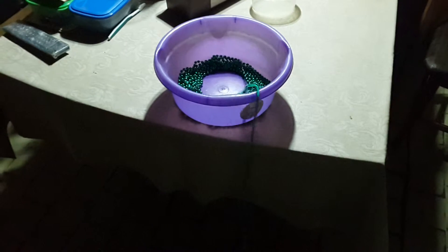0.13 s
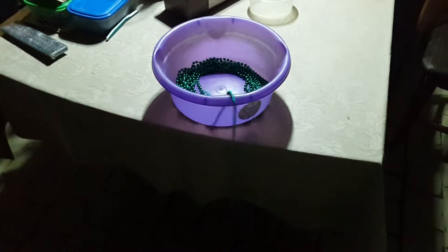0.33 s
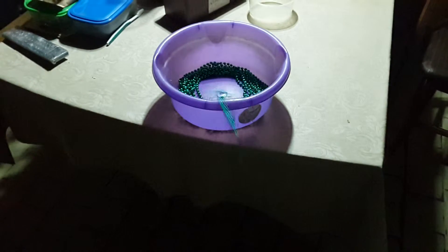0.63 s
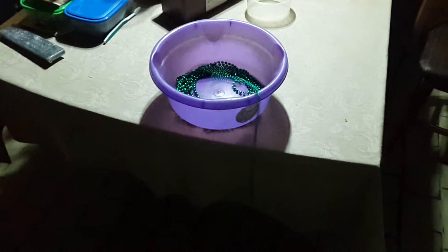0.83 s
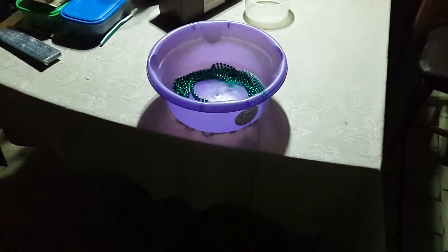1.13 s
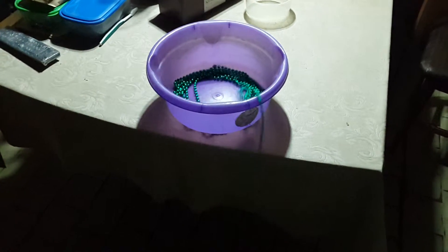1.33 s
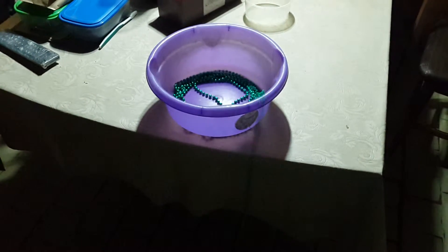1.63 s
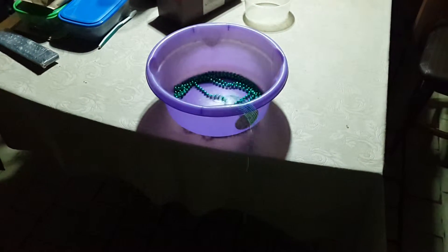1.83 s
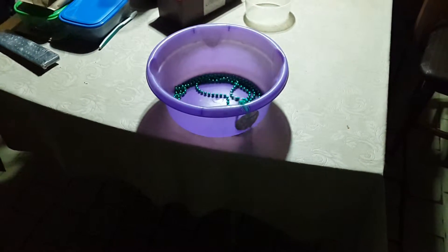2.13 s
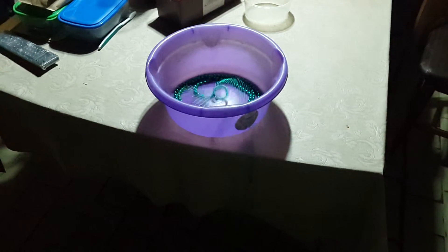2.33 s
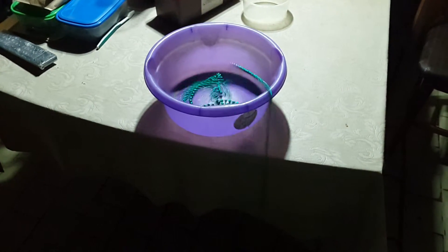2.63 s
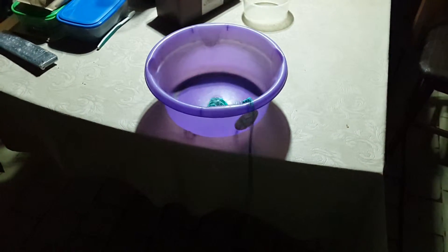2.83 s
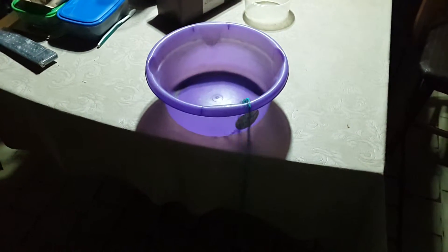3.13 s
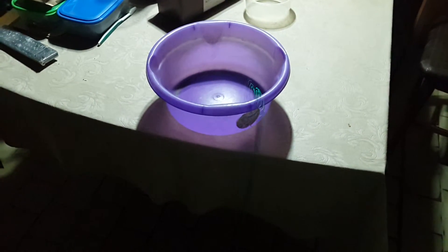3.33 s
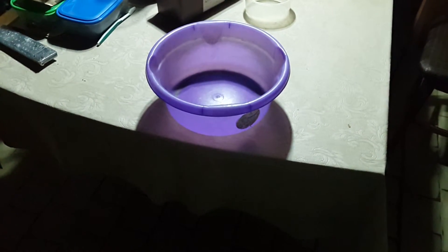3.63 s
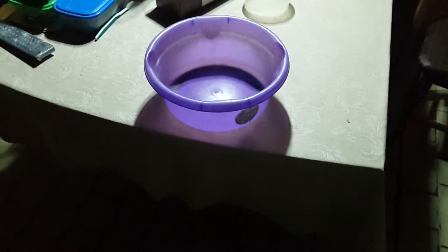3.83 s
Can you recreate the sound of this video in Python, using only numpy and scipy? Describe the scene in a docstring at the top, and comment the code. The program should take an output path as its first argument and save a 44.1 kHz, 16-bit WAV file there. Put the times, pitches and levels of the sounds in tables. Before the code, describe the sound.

A bead chain rattles out of a plastic bowl and pours onto the floor.

```python
"""A plastic bowl on a table in a small room, a phone microphone near enough to favour the direct sound.
From the start a long bead chain pulls itself over the rim in surges and pours onto the floor below.
Beads drag, loops slap: each contact ticks, rings the wall and knocks the base, and the table top hums.
Along the way single beads snap against the rim and the jolted bowl clacks. At about 3.5 s it runs
empty; the tail lands with a thin bright rattle, heard alone, and a few beads settle."""
import sys
import numpy as np
from scipy import signal
from scipy.fft import rfft, irfft
from scipy.io import wavfile
from scipy.ndimage import uniform_filter1d

SR = 44100
rng = np.random.default_rng(int(sys.argv[2]) if len(sys.argv) > 2 else 0)


def transcribe(signal):
    """Save signal, clipped to [-1, 1], as a 16-bit WAV file at the path in sys.argv[1]."""
    frames = np.atleast_2d(signal).T
    limited = np.clip(frames, -1, 1)
    pcm = np.round(limited * 32767).astype(np.int16)
    wavfile.write(sys.argv[1], SR, pcm)


N = 176400  # 4 s
RIM_BEADS_PER_S, RIM_CLUMP_DB = 850, 3.5


def undb(db):
    """Decibels to gain."""
    return 10 ** (np.asarray(db) / 20)


def unit(h):
    """Scale a response to unit energy."""
    return h / np.sqrt(np.sum(h ** 2, axis=-1, keepdims=True))


def fade(t, t60):
    """Ring-down that loses 60 dB in t60 seconds."""
    return np.exp(-np.log(1000) * t / t60)


def colour(points, size=2048):
    """Causal response with the outline (frequency [Hz], gain [dB])."""
    hz, db = np.array(points, float).T
    bins_hz = np.maximum(np.fft.rfftfreq(size, 1 / SR), 1)
    cepstrum = irfft(np.log(undb(np.interp(np.log(bins_hz), np.log(hz), db))))
    cepstrum[1:size // 2] *= 2
    cepstrum[size // 2 + 1:] = 0
    return irfft(np.exp(rfft(cepstrum)))


def through(x, h):
    """Pass a sound through a response."""
    return signal.oaconvolve(x, h, axes=-1)[..., :x.shape[-1]]


def stereo_noise(likeness, length, spots=10):
    """Random left and right values for each contact spot; likeness 1 makes the sides equal."""
    mid, side = rng.standard_normal((2, spots, 1, length))
    return mid * np.sqrt(1 + likeness) + side * np.sqrt(1 - likeness) * np.array([[1], [-1]])


def tick(points, t60, likeness, resonance_db=0, spots=10, size=1024):
    """A bead's short crack, duller on soft spots, brighter on hard; resonance_db gives each a pitch."""
    outline_hz, outline_db = np.array(points, float).T
    hz = np.geomspace(outline_hz[0], outline_hz[-1], size // 10)
    db = np.interp(np.log(hz), np.log(outline_hz), outline_db)
    hardness_db_per_octave = 5 * np.linspace(-1, 1, spots)[:, None]
    tilts = hardness_db_per_octave * np.maximum(np.log2(hz / 4080), -1)
    bead_hz = rng.permutation(np.geomspace(4570, 7090, spots))[:, None]
    humps = resonance_db * np.exp(-(np.log2(hz / bead_hz) / .11) ** 2)
    burst = stereo_noise(likeness, size) * fade(np.arange(size) / SR, t60)
    colours = np.array([[colour(np.c_[hz, db + shape])] for shape in tilts + humps])
    return unit(through(burst, colours))


def ring(modes, detune=0, spots=10, size=6000):
    """Damped modes, mixed anew at each spot; the chain's weight shifts pitch by up to the share detune."""
    hz, db, t60 = np.array(modes).T[:, :, None]
    t = np.arange(size) / SR
    mix = stereo_noise(likeness=1, length=len(modes))
    mix /= np.sqrt(np.mean(mix ** 2, axis=0))
    shift = 1 + detune * rng.permutation(np.linspace(-1, 1, spots))[:, None, None]
    partials = undb(db) * unit(np.sin(2 * np.pi * hz * shift * t) * fade(t, t60))
    return unit(mix @ partials)


def radiate(pushes, responses, places=5):
    """What the contact spots give off, gathered into a few places in the room."""
    return through(pushes[:, None], responses).reshape(places, -1, 2, N).sum(axis=1)


def pressure(stretches, attack_s=0.0012, release_s=0.0092):
    """Contact strength: builds fast, sags to its end level (negative sag swells) and lets go."""
    out = np.zeros(N)
    for start, end, end_db, sag_db in stretches:
        i = np.arange(int(start * SR), min(int((end + 10 * release_s) * SR), N))
        t = i / SR
        along = np.clip((t - start) / (end - start), 0, 1)
        attack = np.clip((t - start) / attack_s, 0, 1)
        release = np.exp(-np.maximum(t - end, 0) / release_s)
        out[i] += attack * undb(end_db + sag_db * (1 - along)) * release
    return out


def bead_stream(per_s, clump_db, spread_db=3, clump_s=.004, even_s=0.036, spots=10, size=8000):
    """Beads hit random spots in clumps, unevenly timed and sized; the flow evens out over even_s."""
    late, strength, bunching = rng.standard_normal((3, size))
    spot = rng.integers(0, spots, size)
    when = (np.arange(size) + .6 * late) / per_s
    clumps = np.interp(when / clump_s, np.arange(size), bunching)
    push = undb(spread_db * strength + clump_db * clumps)
    local_power = uniform_filter1d(push ** 2, int(even_s * per_s))
    push *= np.sqrt(SR / per_s / local_power) * rng.choice([-1, 1], size)
    at = (when * SR).astype(int)
    heard = (at >= 0) & (at < N)
    out = np.zeros((spots, N))
    out[spot[heard], at[heard]] = push[heard]
    return out


def clusters(times, dbs, length_s, spots=10, hits=9):
    """A few contacts almost together, hardest a quarter of the way through."""
    out = np.zeros((spots, N))
    for start, db in zip(times, dbs):
        along = (np.arange(hits) + rng.random(hits) - .5).clip(0) / hits
        at = np.minimum(((start + along * length_s) * SR).astype(int), N - 1)
        weights = unit(undb(-14.5 * abs(along - 0.25)))
        out[rng.permutation(spots)[:hits], at] += undb(db) * np.sqrt(length_s * SR) * weights
    return out


def wander(spread_db, step_s=.005, size=4000):
    """Quick random changes of strength as the contact wanders; mean power 1."""
    gain = undb(spread_db * np.interp(np.arange(N) / SR / step_s, np.arange(size), rng.standard_normal(size)))
    return gain / np.sqrt(np.mean(gain ** 2))


# Room tone at the microphone (frequency [Hz], relative level [dB])
ROOM_TONE_COLOUR = [(20, -35), (45, -10.5), (95, 2), (125, -1), (155, -0.5), (330, -9), (720, -18.5),
                    (1500, -28), (6000, -26.5)]
def room_tone():
    """Faint low rumble of the room, nearly alike left and right."""
    noise = stereo_noise(likeness=0.96, length=N, spots=1)[0] / np.sqrt(2)
    return undb(-53) * through(noise, unit(colour(ROOM_TONE_COLOUR))[None])


def room(places, tail_db=-2.5, delay_s=.004, alike_below_hz=910, treble_hz=2000, size=20000):
    """Each place has its own short diffuse tail; bass is alike at both ports and treble dies first."""
    t = np.arange(size) / SR
    mid, side = rng.standard_normal((2, len(places), size))
    side = signal.sosfilt(signal.butter(2, alike_below_hz, "high", fs=SR, output="sos"), side)
    noise = np.stack([mid + side, mid - side], axis=1)
    low = signal.sosfiltfilt(signal.butter(4, treble_hz, fs=SR, output="sos"), noise)
    decay = low * fade(t, t60=0.37) + (noise - low) * fade(t, t60=0.22)
    tail = unit(decay * (t > delay_s))
    return (places + undb(tail_db) * through(places, tail)).sum(axis=0)


# Modes of the table top (frequency [Hz], relative level [dB], t60 [s])
TABLE_MODES = [(92, -18, 0.12), (126, 1, 0.33)]
# Drive on the table, under the bowl (time [s], level [dB])
TABLE_DRIVE = [(0, -54), (1.9, -63), (2.4, -77), (3.5, -71), (3.7, -86)]
def table_hum():
    """The running chain drums the table top into a low hum."""
    times, dbs = np.array(TABLE_DRIVE).T
    drive = undb(np.interp(np.arange(N) / SR, times, dbs))
    pushes = bead_stream(RIM_BEADS_PER_S, RIM_CLUMP_DB).sum(axis=0) * drive
    return through(pushes[None], ring(TABLE_MODES)[0])


# Down on the floor: the chain landing, its tail last (start [s], end [s], end level [dB], sag [dB])
FLOOR_LANDINGS = [(0, 3.66, -41, 3.5), (3.58, 3.7, -45, -11), (3.685, 3.74, -40, 5),
                  (3.741, 3.790, -25.5, -0.5), (3.80, 3.9, -49, -4)]
# Last beads settling (time [s], relative level [dB])
FLOOR_SETTLES = [(3.65, -30), (3.685, -23), (3.899, -25.5), (3.922, -32.5), (3.9599, -38), (3.9806, -27),
                 (3.9914, -28)]
# A bead's tick on the floor (frequency [Hz], relative level [dB])
FLOOR_TICK_COLOUR = [(300, -35), (1500, -31), (3000, -19), (4500, -14.5), (6000, -10.5), (8000, -1),
                     (11000, 1.5), (15000, -2.5)]
def floor_heap():
    """The chain pours steadily onto its heap; the tail drops and a few beads roll into place."""
    times, dbs = np.array(FLOOR_SETTLES).T
    pouring = bead_stream(per_s=650, clump_db=-0.5) * pressure(FLOOR_LANDINGS)
    settling = clusters(times, dbs - 5.5, length_s=0.0013)
    return radiate(pouring + settling, tick(FLOOR_TICK_COLOUR, t60=0.007, likeness=0))


# Up on the table: jolts of the bowl (time [s], frequency [Hz], level [dB], t60 [s])
BOWL_JOLTS = [(1.131, 650, -15, 0.06), (1.317, 1015, -25.5, 0.21), (2.455, 494, -27, 0.2),
              (2.784, 455, -25, 0.22), (3.021, 1364, -20.5, 0.12), (3.944, 480, -40.5, 0.031)]
def bowl_knocks(rise_s=0.00053):
    """Each jolt rings one damped mode of the bowl: a short knock or clack."""
    out = np.zeros(N)
    for start, hz, db, t60 in BOWL_JOLTS:
        t = np.maximum(np.arange(N) / SR - start, 0)
        out += undb(db) * np.sin(2 * np.pi * hz * t) * fade(t, t60) * (1 - np.exp(-t / rise_s))
    return out


# At the rim: single beads striking (time [s], pitch [Hz], level [dB])
RIM_SNAPS = [(0.0621, 5370, -3.5), (0.086, 6000, -6), (0.2594, 5600, -5), (0.8307, 2700, -2),
             (0.8982, 5800, -3.5), (1.1728, 4800, -7), (1.4194, 5200, -1.5), (1.7078, 2500, -1),
             (1.9158, 6300, -5.5), (2.1132, 5200, -7), (2.6963, 7000, 2.5), (2.952, 7500, 3.5),
             (3.0074, 5500, -1.5), (3.2074, 5000, -0.5), (3.373, 6000, -3), (3.4254, 4200, 3),
             (3.4270, 4600, 1.5)]
def rim_snaps(size=1024):
    """Single beads whip against the rim: hard clicks, each with its own pitch."""
    out = np.zeros((2, N))
    t = np.arange(size) / SR
    for start, hz, db in RIM_SNAPS:
        burst = stereo_noise(likeness=0.33, length=size, spots=1)[0] * fade(t, t60=0.0067)
        peak = colour([(hz / 10, -12), (hz, 0), (hz * 2, -11.5)])
        at = int(start * SR)
        out[:, at:at + size] += undb(db) * unit(through(burst, peak[None]))
    return out


# Surges of chain over the bowl's wall, with the levels they end on
# (start [s], end [s], tick [dB], wall [dB], base [dB], sag [dB])
CHAIN_DRAGS = [(0, 0.179, -28, -31, -34, -0.5), (0.201, 0.309, -29, -33.5, -35.5, 1),
               (0.321, 0.429, -27.5, -30.5, -33, -2.5), (0.465, 0.605, -31, -28.5, -34, 2.5),
               (0.611, 0.735, -29.5, -30, -35.5, 0.5), (0.825, 0.93, -35, -34, -40.5, 8.5),
               (0.947, 1.036, -29.5, -34, -38.5, 3), (1.096, 1.145, -28.5, -28.5, -38, 4.5),
               (1.184, 1.217, -31, -31, -37, 5.5), (1.248, 1.278, -29.5, -30, -37.5, 2),
               (1.295, 1.359, -27, -30, -33, -1), (1.423, 1.518, -30.5, -34, -38, -0.5),
               (1.53, 1.646, -30, -33.5, -36, 2), (1.678, 1.835, -30, -29, -33.5, 1),
               (1.853, 1.911, -29, -31.5, -35.5, 2.5), (2.009, 2.056, -29.5, -33.5, -36.5, 7.5),
               (2.07, 2.194, -29, -29.5, -35.5, 0), (2.279, 2.4, -32.5, -35.5, -41.5, 6.5),
               (2.428, 2.538, -29, -35.5, -37, 1), (2.601, 2.68, -32, -29.5, -38, 6.5),
               (2.685, 2.839, -28, -30, -36, -0.5), (2.843, 2.946, -33.5, -35, -39, 1.5),
               (2.957, 3.072, -31, -30.5, -34, 2), (3.085, 3.267, -28, -26, -34, -1.5),
               (3.282, 3.361, -32.5, -35, -38, 3), (3.377, 3.414, -30, -28, -31.5, 0.5),
               (3.434, 3.459, -38, -46, -31.5, 0.5), (3.474, 3.543, -34.5, -34.5, -40.5, 6)]
# Loops slapping the bowl, levels before trim (time [s], tick [dB], wall [dB], base [dB])
LOOP_SLAPS = [(0.2037, -15, -14, -42), (0.2231, -9, -12.5, -22), (0.472, -10.5, -13.5, -35),
              (0.5218, -15, -15.5, -28), (0.7155, -12.5, -41, -26), (0.8248, -15, -16.5, -40),
              (0.9913, -11.5, -30, -22), (1.0974, -13.5, -17, -28), (1.1318, -11, -25, -19.5),
              (1.1914, -8, -16.5, -45), (1.2528, -11.5, -24, -49), (1.4101, -8.5, -17.5, -24),
              (1.4529, -13.5, -22, -45), (1.6273, -9.5, -21.5, -26), (1.706, -24, -13.5, -44),
              (2.0088, -9.5, -13.5, -40), (2.0169, -24, -14.5, -39), (2.0717, -10.5, -20, -47),
              (2.2712, -9.5, -16.5, -28), (2.2832, -20, -11, -29), (2.3647, -10, -17, -43),
              (2.4572, -11, -18.5, -43), (2.6035, -9, -19.5, -38), (2.6186, -13, -13.5, -29),
              (2.7446, -10.5, -31, -41), (2.7574, -12, -23, -20.5), (3.0252, -14, -36, -15.5),
              (3.1108, -13.5, -21, -41), (3.4744, -12.5, -23, -20), (3.509, -8.5, -16, -36),
              (3.5222, -11.5, -25, -46)]
# A bead's tick on the plastic (frequency [Hz], relative level [dB])
BOWL_TICK_COLOUR = [(100, -45), (300, -18.5), (1000, -10.5), (1600, 1), (3000, -2.5), (4200, 2),
                    (6000, -1.83), (8000, -3), (10000, -6), (12000, -9), (15000, -15)]
# Modes of the thin wall and of the base (frequency [Hz], relative level [dB], t60 [s])
WALL_MODES = [(1903, -4, 0.026), (2066, -3.5, 0.041), (2162, 3.5, 0.023), (2318, 0, 0.025),
              (2500, -4, 0.021), (2716, -6, 0.01), (2957, -7, 0.011)]
BASE_MODES = [(207, -18.5, 0.049), (348, -9.5, 0.088), (372.3, -7.5, 0.14), (450.5, -4, 0.071),
              (541, 0.5, 0.032), (637.5, -2.5, 0.037), (741, -8, 0.059), (872, -5.5, 0.059),
              (1016, -4.5, 0.045), (1184, -4, 0.054), (1336, -5, 0.057), (1533, -2, 0.039)]
def chain_on_bowl(empty_s=3.55):
    """Dragging beads and slapping loops drive tick, wall and base; a light rattle runs between surges."""
    drags, slaps = np.array(CHAIN_DRAGS), np.array(LOOP_SLAPS)
    stream = bead_stream(RIM_BEADS_PER_S, RIM_CLUMP_DB)
    running = np.arange(N) / SR < empty_s
    bead_tick = tick(BOWL_TICK_COLOUR, t60=0.0095, likeness=0.076, resonance_db=6.5)
    wall = ring(WALL_MODES, detune=0.031)
    base = ring(BASE_MODES)
    # each setting: tick, wall, base
    rattle_db, wander_db = (-40.5, -41.5, -43.5), (2, 3, 2.5)
    slap_trim_db, slap_s = (-11.5, -7, -6.5), (.005, .011, 0.00807)
    out = 0
    for k, response in enumerate([bead_tick, wall, base]):
        surges = pressure(drags[:, [0, 1, 2 + k, -1]])
        force = np.hypot(surges, running * undb(rattle_db[k]))
        dragging = stream * force * wander(wander_db[k])
        slapping = clusters(slaps[:, 0], slaps[:, 1 + k] + slap_trim_db[k], slap_s[k])
        out = out + radiate(dragging + slapping, response)
    return out


def scene():
    """Bowl and floor in a quiet room; a high-pass keeps the rattle and knocks free of low thump."""
    places = np.concatenate([chain_on_bowl() + floor_heap(), rim_snaps()[None]])
    rattle = room(places) + bowl_knocks()
    bass_cut = signal.butter(2, 230, "high", fs=SR, output="sos")
    return signal.sosfilt(bass_cut, rattle) + table_hum() + room_tone()


# Colour of the phone's two microphone ports (frequency [Hz], gain [dB])
LEFT_PORT_COLOUR = [(100, -11.5), (600, -6.5), (2200, -3), (4200, -2.5), (6500, 0.5), (8500, 5), (10000, 2),
                    (12000, -2.5), (14000, -1)]
RIGHT_PORT_COLOUR = [(100, -11), (1200, -1), (2200, 1.5), (3600, 5.5), (4400, 6), (4950, 9), (5400, 13),
                     (5900, 13.5), (6400, 10), (7000, 5.5), (8000, -1), (10000, -4.5), (14000, -3.5)]
def record(dry, top_hz=15450):
    """Each port has its own resonance; the phone clips peaks at full scale and cuts the top."""
    ported = through(dry, np.array([colour(LEFT_PORT_COLOUR), colour(RIGHT_PORT_COLOUR)]))
    top_cut = signal.ellip(8, .2, 70, top_hz, fs=SR, output="sos")
    return signal.sosfilt(top_cut, np.clip(ported, -1, 1))


dry = scene()
out = record(dry)
transcribe(out)
```